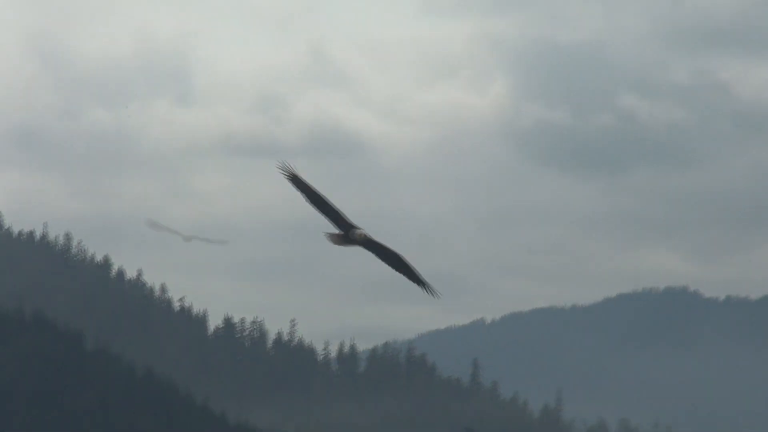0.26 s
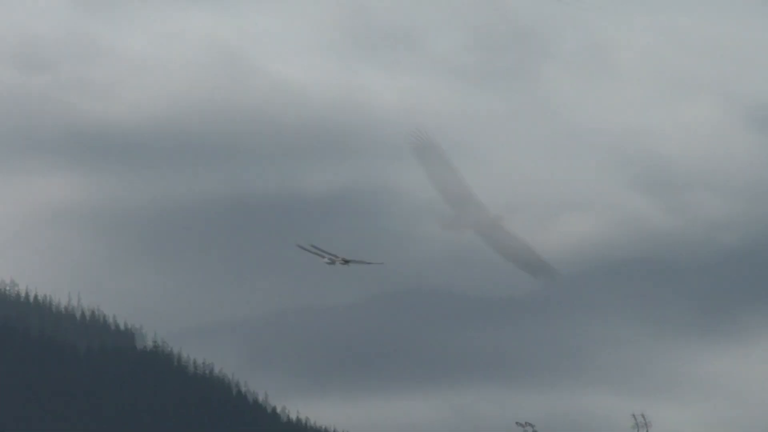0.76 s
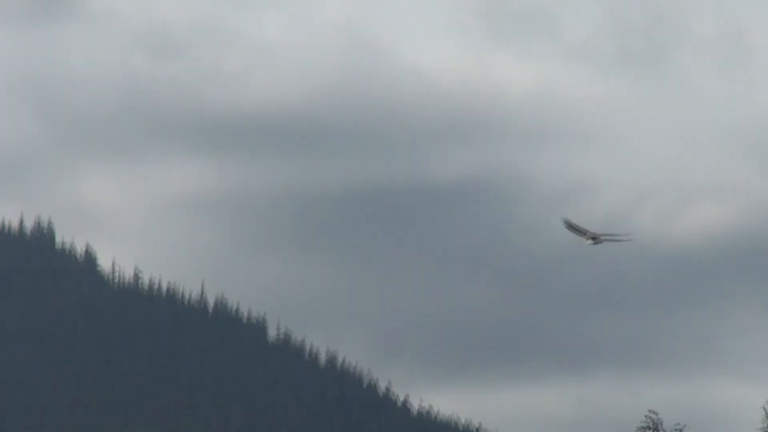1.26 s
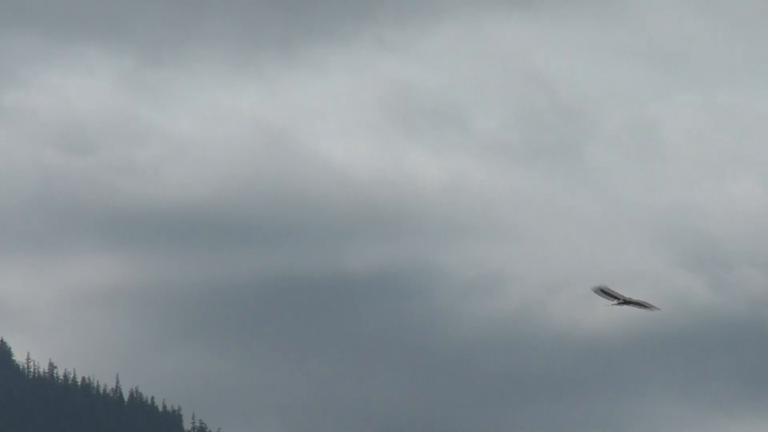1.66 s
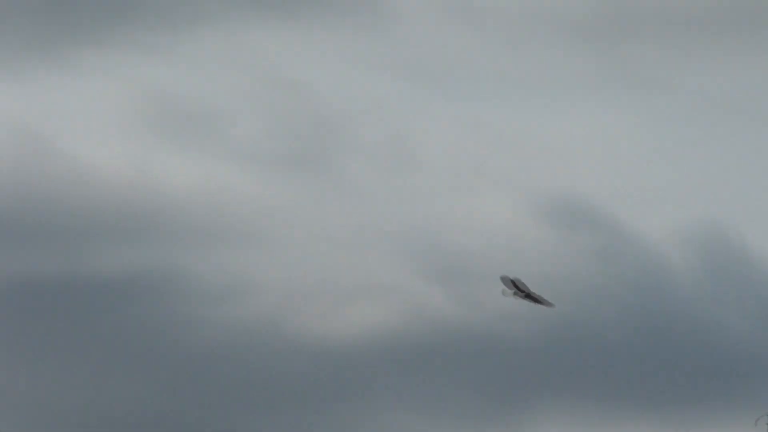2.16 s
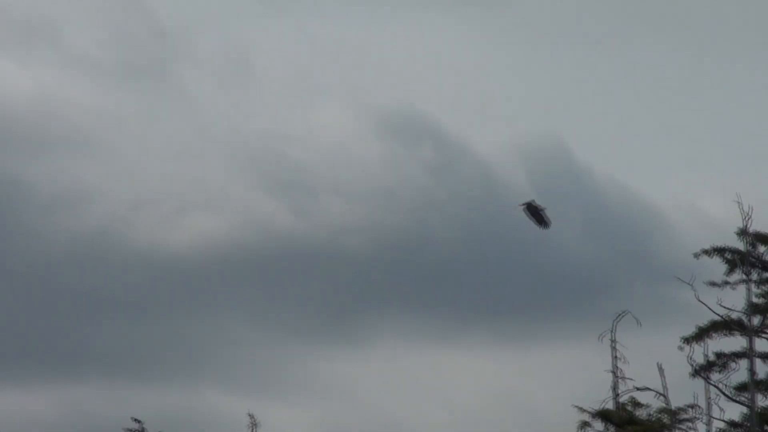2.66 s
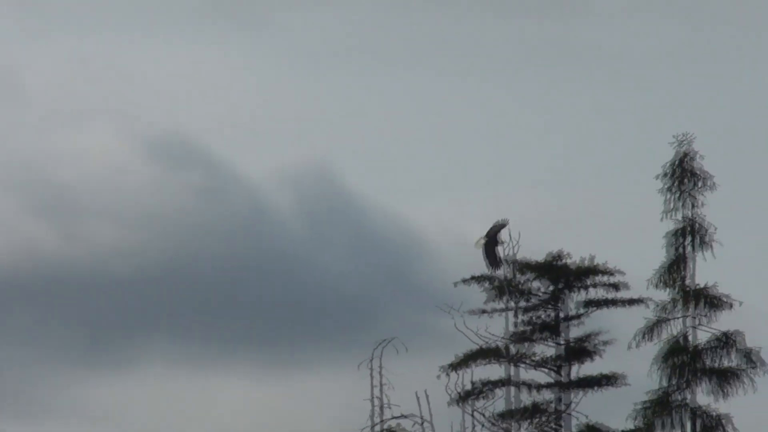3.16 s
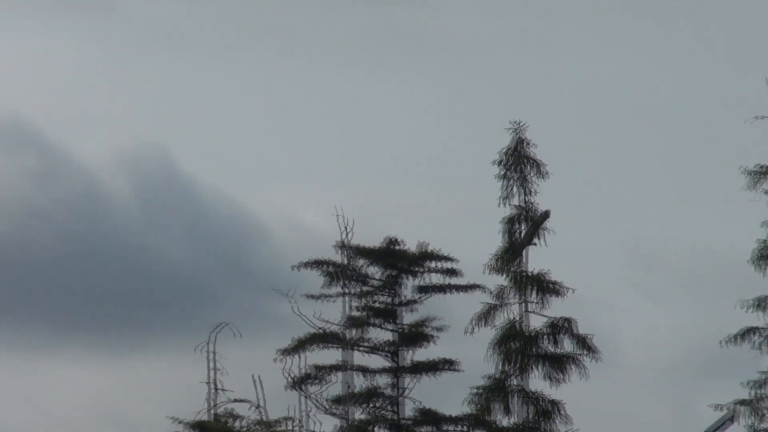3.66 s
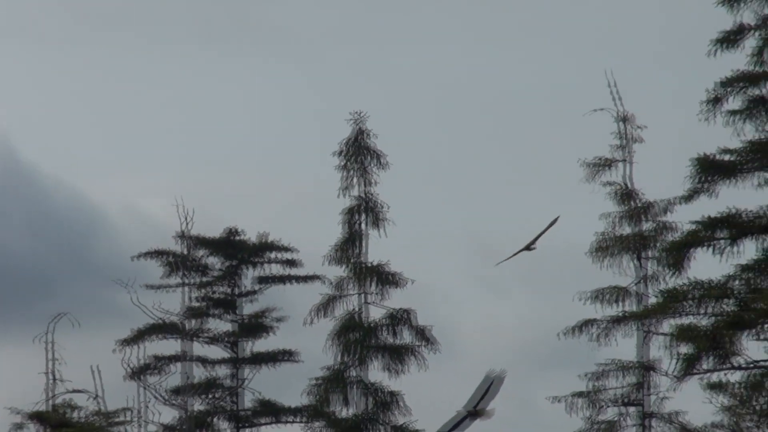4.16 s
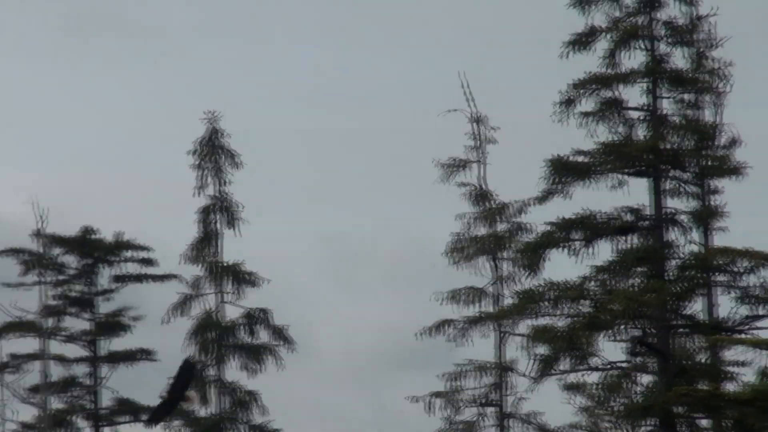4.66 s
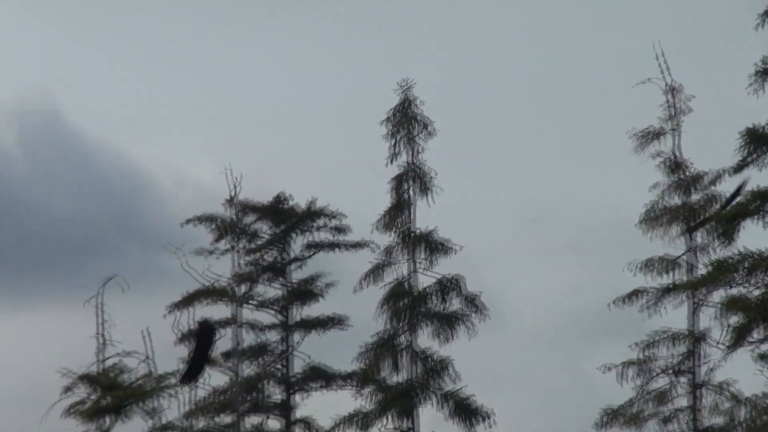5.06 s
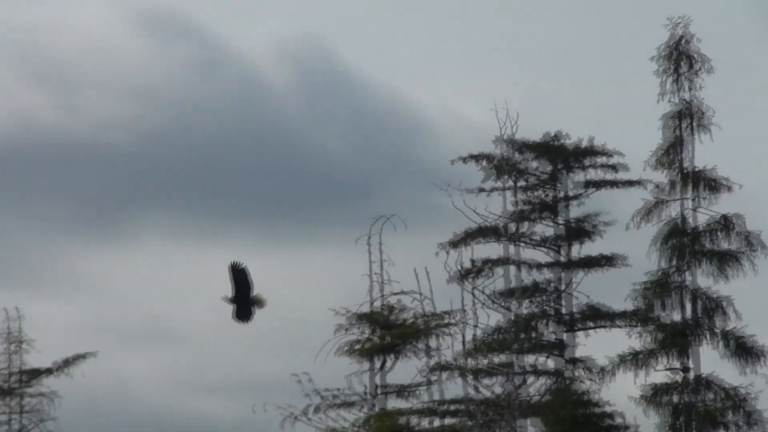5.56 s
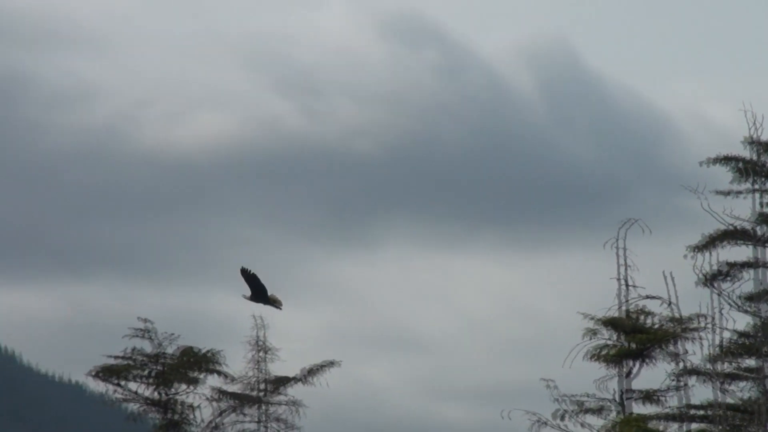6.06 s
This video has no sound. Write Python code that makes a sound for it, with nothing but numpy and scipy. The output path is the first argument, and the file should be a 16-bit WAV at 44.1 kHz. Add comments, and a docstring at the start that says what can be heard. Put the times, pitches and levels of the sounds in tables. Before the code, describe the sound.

Eagles chatter outdoors in a conifer forest, their piercing chirps and sliding whistles coming in quick, stuttering runs with a short echo. Before them, a small bird warbles over a brief soft rush and one far eagle gives a wavering call. The chatter then comes closer, grows louder and weakens at the end. Underneath are a quiet steady hiss, a very faint electric hum and a few tiny snaps close to the microphone.

```python
"""A rushing noise and a small bird's warble come first; the rush fades into the hiss of a forest valley.
A far eagle's call arrives blurred by echoes, then nearer eagles chatter: held notes, glides and fast
plunges of pitch, each a fluttering tone of the syrinx that rings on among the conifer trunks.
A faint electric hum sits mostly on the right, and now and then something snaps near the microphone."""
import sys
import numpy as np
from scipy import signal
from scipy.fft import rfft, irfft, next_fast_len
from scipy.io import wavfile
from scipy.ndimage import map_coordinates

SR = 44100
rng = np.random.default_rng(int(sys.argv[2]) if len(sys.argv) > 2 else 0)


def generate_wav(sig):
    """Save sig (samples, or channels by samples) to the path in sys.argv[1] as 16-bit PCM at SR."""
    pcm = np.round(np.clip(np.atleast_2d(sig).T, -1, 1) * 32767).astype(np.int16)
    wavfile.write(sys.argv[1], SR, pcm)


N = 278712
THIN_OCTAVE_DB = -36  # second harmonic of the eagles' whistles, glides and plunges


def amp(db):
    """Decibel law: amplitude grows tenfold every 20 dB."""
    return 10 ** (np.asarray(db) / 20)


def unit(x):
    """Normalisation to an rms of 1."""
    return x / np.sqrt(np.mean(x ** 2) + 1e-20)


def along(points, hz):
    """Interpolation of (Hz, value) points on a logarithmic frequency axis."""
    freqs, values = np.transpose(points)
    return np.interp(np.log(hz + 1), np.log(freqs + 1), values)


def curves(rows):
    """Linear interpolation in time: one curve for each column after the first."""
    times, *columns = np.transpose(rows)
    return [np.interp(np.arange(N) / SR, times, column) for column in columns]


def wobble(rate):
    """Random modulation: a spline through `rate` Gaussian knots a second."""
    return map_coordinates(rng.standard_normal(int(N * rate / SR) + 4), [np.arange(N) * rate / SR])


def filtered(x, response):
    """Linear filtering: the spectrum is multiplied by a frequency response."""
    size = next_fast_len(N + SR // 2)
    return irfft(rfft(x, size) * response(np.fft.rfftfreq(size, 1 / SR)), size)[..., :N]


def hiss(colour, coherence, lean=((1, 0),)):
    """Partial coherence: the sum and difference of two noises make a stereo pair of rms 1."""
    mid, side = rng.standard_normal((2, N))
    angle = np.arccos(coherence) / 2
    pair = np.cos(angle) * mid + np.sin(angle) * np.array([side, -side])
    return unit(filtered(pair, lambda hz: amp(along(colour, hz) + np.outer([.5, -.5], along(lean, hz)))))


def background():
    """Shaped broadband noise: a rush dies away in about a second while the valley's hiss stays."""
    # Envelopes. Each row: time in seconds, level in dB.
    rush_levels = [(0, -50), (.42, -51.5), (.7, -58), (1.2, -93)]
    valley_levels = [(0, -52), (3.5, -54), (4.6, -52), (6.32, -50.5)]
    # Spectra. Each row: frequency in Hz, relative density in dB.
    rush_colour = [(100, -26), (240, -5.5), (990, 3.5), (2500, -18), (5000, -57)]
    valley_colour = [(40, -34), (90, -31.5), (130, -8), (230, -14.5), (430, -4), (1400, -5), (2700, -10.5),
                     (7000, -19.5), (14300, -33), (15700, -48)]
    # Balance of the hiss. Each row: frequency in Hz, left minus right in dB.
    valley_lean = [(100, -18.5), (400, -4), (1300, 1), (5000, 4.5), (15000, -5.5)]
    rush_gain = amp(curves(rush_levels)[0] + 0.51 * wobble(9))
    rush = rush_gain * hiss(rush_colour, coherence=0.64, lean=[(200, -19.5), (2000, -1.0)])
    valley_gain = amp(curves(valley_levels)[0] + .45 * wobble(3))
    return rush + valley_gain * hiss(valley_colour, coherence=0.42, lean=valley_lean)


def hum():
    """A harmonic series: electric hum, each partial slightly unsteady in level, louder on the right."""
    # Each row: frequency in Hz, relative level in dB.
    partials = [(59.2, -66), (118.4, -67), (177.6, -75), (296.1, -92.5)]
    t = np.arange(N) / SR
    tone = sum(amp(db - 4.5 + .4 * wobble(4.9)) * np.sin(2 * np.pi * (hz * t + rng.random()))
               for hz, db in partials)
    return tone * amp([[-12], [5]])


def snaps():
    """Transients: brief, rough envelopes on noise are heard as snaps close by."""
    # Each row: start in seconds, relative level in dB, length in seconds.
    bursts = [(0.402, -54, 0.015), (0.538, -57, 0.019), (1.766, -60, 0.015), (1.82, -63, .009),
              (2.966, -48, 0.014)]
    # Their spectrum. Each row: frequency in Hz, relative density in dB.
    colour = [(400, -49), (650, 2), (850, -7), (1080, -3), (1700, -17), (3600, -12), (15000, -37.5)]
    gate = np.zeros(N)
    for start, db, length in bursts:
        progress = np.arange(round(length * SR) + 9) / (length * SR + 9)
        gate[round(start * SR):][:len(progress)] += amp(db + 12) * np.sin(np.pi * progress ** 0.7) ** 2
    return gate * amp(2.2 * wobble(500)) * hiss(colour, coherence=0.6)


def forest(calls, steps=20):
    """Reverberation by scattering: echo patterns cross-fade, as they do when birds move among trunks."""
    # Decay of the far slopes' echoes. Each row: frequency in Hz, time to fall 60 dB in seconds.
    far_t60 = [(2000, 1), (9000, 0.76)]
    # Trunks return low notes more weakly. Each row: frequency in Hz, gain in dB.
    echo_colour = [(2000, -7), (3000, -2), (4000, 0), (7000, 0)]
    near_t60 = 0.14  # seconds, for the near trunks
    echoes, hop = np.zeros((2, N)), N / steps
    calls = calls * amp(5.83 * wobble(160))  # swaying boughs blur the pitch they throw back
    for k in range(steps + 1):
        span = np.arange(max(round((k - 1) * hop), 0), min(round((k + 1) * hop), N))
        shared, *sides = rng.standard_normal((3, SR))
        hz, t, spectra = signal.stft(1.03 * shared + .5 * np.array(sides), SR, nperseg=256)
        decay = amp(-60 * t / along(far_t60, hz)[:, None]) + 2.3 * amp(-60 * t / near_t60)
        tail = signal.istft(spectra * decay, SR, nperseg=256)[1]
        piece = calls[span] * np.cos(np.pi / 2 * (span / hop - k))
        wet = signal.fftconvolve(piece[None], tail / np.linalg.norm(tail[0]), axes=1)
        echoes[:, span[0]:span[0] + wet.shape[1]] += wet[:, :N - span[0]]
    return filtered(echoes, lambda hz: amp(along(echo_colour, hz)))


def far_eagle():
    """Multipath smearing: echoes melt distant notes into two wavering, pulsing bands of noise."""
    # The two voices. Each row: time in seconds, pitch in Hz, level in dB.
    lower = [(0.85, 3893, -58), (1.0, 4090, -56.5), (1.25, 4115, -58), (1.42, 4150, -53.5),
             (1.95, 4160, -82)]
    upper = [(.9, 4770, -63), (.96, 4990, -55.5), (1.05, 5080, -57.5), (1.25, 5185, -56), (1.55, 5190, -73)]
    call, t = np.zeros(N), np.arange(N) / SR
    for voice in lower, upper:
        hz, db = curves(voice)
        gate = np.clip(np.minimum(t - voice[0][0], voice[-1][0] - t) * 50, 0, 1)
        phase = 2 * np.pi * np.cumsum(hz + 40 * wobble(18)) / SR
        band = wobble(300) * np.sin(phase) + wobble(300) * np.cos(phase)
        call += gate * amp(db + 2 * wobble(20)) * unit(band)
    return call


def syrinx(notes, hoarse, fade_db=0):
    """Phase modulation: flutter roughens a harmonic tone on an arc of pitch, most in fast glides."""
    # Air rushing through the open beak. Each row: frequency in Hz, relative density in dB.
    breath_colour = [(1500, -6.5), (3500, 7.5), (7000, -6), (12000, -30.5)]
    attack, release = 0.24, 0.28  # shares of a note's length
    song = np.zeros(N + SR)
    flutter = np.pad(wobble(350) + 0.2 * wobble(1500), (0, SR))
    breath = amp(-30.5) * np.pad(hiss(breath_colour, coherence=0.97)[0], (0, SR))
    for start, length, start_hz, middle_hz, end_hz, db, octave_db in notes:
        u = np.arange(round(length * SR)) / (length * SR)  # progress from 0 to 1
        span = slice(round(start * SR), round(start * SR) + len(u))
        hz = start_hz * (1 - u) * (1 - 2 * u) + middle_hz * 4 * u * (1 - u) + end_hz * u * (2 * u - 1)
        strain = hoarse + .022 * abs(np.log(end_hz / start_hz)) / length
        phase = 2 * np.pi * np.cumsum(hz) / SR + strain * flutter[span]
        overtones = np.sin(2 * phase) + amp(-27) * np.sin(3 * phase)
        overtones += amp(octave_db - 29) * np.sin(4 * phase)
        voice = np.sin(phase) + amp(octave_db) * overtones + breath[span]
        swell = np.sin(np.pi / 2 * np.clip(np.minimum(u / attack, (1 - u) / release), 0, 1)) ** 2
        song[span] += amp(db + fade_db * (u - .5)) * swell * voice
    return song[:N] * amp(1.95 * wobble(130))


def small_bird():
    """Frequency modulation: one warbled syllable repeats, never quite alike, among single notes."""
    # Each row: start in seconds, level in dB.
    repeats = [(.056, -42), (.16, -40), (0.318, -40.5), (0.424, -41)]
    # A swoop up, a low arch, two dips and a high arch. Each row: delay and length in seconds,
    # start, middle and end pitch in Hz, relative level in dB.
    syllable = [(0, 0.021, 4420, 5950, 6400, -0.5), (.003, 0.022, 4300, 4830, 3770, -3.5),
                (0.017, 0.026, 6300, 5490, 6500, 2.2), (0.042, .022, 6000, 5440, 5900, -7),
                (0.045, 0.02, 6500, 6400, 5800, -3.5)]
    # Each row: start and length in seconds, start, middle and end pitch in Hz, level in dB.
    peeps = [(.001, 0.016, 6020, 6600, 5800, -37), (0.027, .026, 6600, 6500, 5200, -51),
             (.127, 0.028, 3150, 3750, 3600, -49.5), (0.186, 0.033, 4930, 5070, 4820, -44),
             (.566, 0.028, 3440, 4320, 4990, -53.5), (0.1, 0.018, 3500, 3830, 3700, -54),
             (.197, 0.024, 3280, 3830, 3600, -53), (.408, 0.022, 2274, 2595, 2750, -54),
             (0.725, 0.013, 4200, 5600, 6400, -51.5), (0.733, .03, 6440, 4800, 3800, -50),
             (0.805, 0.034, 4500, 5270, 4860, -53.5), (0.838, .03, 7200, 6500, 6170, -56),
             (.86, 0.033, 7400, 7800, 8140, -63)]
    pitch_scatter, scatter_db, octave_db = 0.014, 1, -28
    warble = [(start + delay, length, *np.multiply(hz, 1 + pitch_scatter * rng.standard_normal(3)),
               db + part_db + scatter_db * rng.standard_normal())
              for start, db in repeats for delay, length, *hz, part_db in syllable]
    return syrinx([(*note, octave_db) for note in warble + peeps], hoarse=0.52)


def eagle_whistles():
    """Nearly pure tones: thin notes settle on a pitch, or glide and slow as they arrive."""
    # Each row: start and length in seconds, pitch in Hz, level in dB.
    whistles = [(1.488, 0.034, 6300, -52), (2.33, 0.024, 5050, -54), (2.373, .068, 5000, -52),
                (2.434, .037, 5060, -49), (2.482, 0.058, 4910, -43), (2.5, 0.033, 5110, -48),
                (2.599, 0.021, 5040, -42.5), (2.602, 0.022, 3840, -37.5), (3.661, .041, 6720, -46),
                (3.673, 0.064, 5830, -47.5), (3.699, 0.036, 4940, -39), (3.786, 0.026, 5870, -46),
                (3.793, 0.049, 5090, -30.5), (3.902, 0.032, 5130, -35), (4.013, .031, 4990, -26),
                (4.129, 0.018, 4960, -34), (4.327, 0.016, 6540, -29.5), (4.562, .015, 5300, -35.5),
                (5.212, 0.024, 7090, -33.5), (5.229, 0.026, 7130, -33.5), (5.257, 0.031, 6030, -34),
                (5.282, 0.013, 5100, -24.5), (5.356, 0.022, 5970, -39), (5.366, .041, 5210, -26),
                (5.476, 0.03, 5220, -28.5), (5.499, 0.037, 5200, -41)]
    # Each row: start and length in seconds, start and end pitch in Hz, level in dB.
    glides = [(0.932, 0.022, 2710, 4680, -48), (0.94, 0.026, 3410, 3720, -47.5),
              (2.186, 0.038, 5100, 6300, -55), (2.217, .01, 4480, 6200, -31.5),
              (2.223, 0.054, 3260, 3760, -48), (2.242, 0.0089, 7400, 5300, -39),
              (2.412, .02, 4360, 4020, -43.5), (2.514, 0.023, 4400, 3900, -36.5),
              (3.221, 0.022, 3200, 3590, -52), (3.626, 0.045, 5520, 6700, -44.5),
              (3.712, .033, 4380, 3890, -38.5), (3.825, 0.02, 4600, 4060, -37.5),
              (3.93, 0.015, 4530, 4110, -31), (3.937, 0.014, 3660, 3260, -47.5),
              (4.039, 0.012, 4170, 4120, -26), (4.164, .012, 3320, 3100, -52),
              (4.321, .01, 4370, 6520, -31.5), (4.35, .01, 3980, 2790, -29.5),
              (4.411, 0.011, 4170, 5730, -43.5), (4.46, .012, 3485, 2800, -27),
              (5.003, 0.021, 2970, 4720, -47.5), (5.172, 0.01, 4450, 6390, -35.5),
              (5.176, 0.048, 6000, 7680, -36.5), (5.292, 0.018, 4440, 3970, -25),
              (5.394, 0.024, 4730, 4150, -29), (5.502, 0.016, 4630, 4216, -22),
              (5.51, 0.018, 4620, 4310, -42), (5.77, .041, 2700, 3470, -50),
              (6.11, 0.039, 2790, 3530, -49.5)]
    onset_ratio, done_halfway = 1.011, 0.8
    held = [(start, length, hz * onset_ratio, hz, hz, db) for start, length, hz, db in whistles]
    gliding = [(start, length, from_hz, from_hz + done_halfway * (to_hz - from_hz), to_hz, db)
               for start, length, from_hz, to_hz, db in glides]
    return syrinx([(*note, THIN_OCTAVE_DB) for note in held + gliding], hoarse=0.41)


def eagle_plunges():
    """Downward sweeps: each rough drop speeds up towards one low pitch, losing voice on the way."""
    # Each row: start and length in seconds, start pitch in Hz, level at mid-note in dB.
    drops = [(1.489, .011, 6420, -49), (2.218, .027, 6570, -38.5), (2.337, .016, 5560, -39),
             (2.448, .01, 4720, -45), (3.674, .013, 6600, -44), (3.778, .018, 7300, -49.5),
             (3.892, .014, 7300, -48), (4.006, .015, 7010, -46), (4.125, .01, 7000, -46.5),
             (4.337, .019, 6060, -38.5), (4.443, .019, 6700, -33), (4.563, .021, 5860, -46),
             (4.694, .013, 5330, -42), (4.832, .0086, 4700, -45), (4.993, .0093, 3800, -47),
             (5.249, .011, 7140, -34), (5.352, .01, 7330, -37.5), (5.467, .011, 7330, -38),
             (5.585, .01, 6910, -40.5), (5.693, .012, 6660, -49), (5.798, .014, 5730, -42)]
    end_hz, done_halfway = 2576, .4
    notes = [(start, length, hz, hz + done_halfway * (end_hz - hz), end_hz, db, THIN_OCTAVE_DB)
             for start, length, hz, db in drops]
    return syrinx(notes, hoarse=1, fade_db=-14)


def eagle_chirps():
    """Harmonic tones: the octave fills out held notes that bend a little at both ends."""
    # Each row: start and length in seconds, pitch in Hz, level in dB, relative octave level in dB.
    chirps = [(0.76, 0.025, 2232, -42, -14), (1.097, 0.024, 2220, -39.5, -11),
              (1.134, .024, 2780, -48.5, -18), (1.156, .028, 2794, -39, -12),
              (1.223, 0.028, 4100, -48, -20), (1.331, .039, 3970, -48, -9.5),
              (1.419, 0.025, 2136, -40.5, -20), (1.443, 0.011, 2855, -44, -23),
              (1.51, 0.015, 2910, -35.5, -15), (2.136, 0.033, 2878, -33, -3),
              (2.14, 0.044, 3855, -43.5, -14), (2.181, 0.014, 2930, -45, -15),
              (2.238, 0.035, 2910, -33.5, -7), (2.285, 0.021, 3990, -50, -23), (2.345, 0.03, 2926, -33, -7),
              (2.462, 0.022, 2780, -31, -7), (2.589, 0.034, 2728, -35, -8.5),
              (2.59, 0.0085, 2475, -38.5, -6), (2.729, 0.011, 3780, -44, -9.5),
              (2.732, 0.017, 2198, -28, -9), (2.895, 0.019, 2066, -32, -7),
              (4.132, 0.033, 4138, -22.5, -30.5), (4.226, .028, 2855, -30, -1.5),
              (4.251, 0.029, 4000, -27, -15.5), (4.252, 0.031, 2940, -27.5, -5.5),
              (4.362, .016, 3005, -26, -8), (4.471, 0.015, 2933, -29, -7.5),
              (4.577, 0.026, 2840, -27.5, -8), (4.704, 0.042, 2798, -31.5, -7),
              (4.837, 0.027, 2720, -29, -15), (4.986, 0.027, 2671, -26.5, -15.5),
              (5.151, 0.023, 2009, -32.5, 5), (5.358, 0.012, 1650, -39, -7),
              (5.587, 0.046, 4304, -21.5, -26), (5.699, .033, 4087, -23.5, -22),
              (5.73, 0.0074, 3250, -37.5, -26), (5.81, 0.019, 3980, -25, -15.5),
              (5.818, 0.027, 2744, -30.5, -22), (5.836, 0.012, 3220, -39, -15),
              (6.146, 0.017, 2220, -37.5, -16), (6.162, 0.022, 2770, -40.5, -15),
              (6.222, 0.033, 2760, -45, -14), (6.273, 0.028, 2705, -50, -22)]
    # Low notes lift into place, high ones sag. Each row: pitch in Hz, start and end as shares above it.
    bends = [(2120, -0.0077, -0.002), (2820, 0.021, -0.0099), (4040, 0.0102, -0.04)]
    pitches, start_bend, end_bend = np.transpose(bends)
    notes = [(start, length, hz * (1 + np.interp(hz, pitches, start_bend)), hz,
              hz * (1 + np.interp(hz, pitches, end_bend)), db, octave_db)
             for start, length, hz, db, octave_db in chirps]
    return syrinx(notes, hoarse=0.3)


def microphone_ports(hz):
    """Level and phase differences: the right port hears the birds louder, and their treble first."""
    # Each row: frequency in Hz, phase lead of the right port in radians.
    lead = [(5000, 0.3), (8000, 1.5)]
    return amp([[-2.1], [1.8]]) * np.exp(1j * np.outer([-.5, .5], along(lead, hz)))


def scene():
    """Superposition: direct calls, early reflections and reverberation add to snaps, hum and hiss."""
    eagles = eagle_chirps() + eagle_whistles() + eagle_plunges()
    eagles = eagles + amp(-14.5) * np.roll(eagles, round(.0115 * SR))  # reflection off the ground
    small, far = small_bird(), far_eagle()
    small = small + amp(-9) * np.roll(small, round(.016 * SR))  # reflection off a near trunk
    echoes = amp(-8) * forest(eagles + 0.98 * small + 1.83 * far)
    birds = eagles + small + 0.82 * far + echoes
    return filtered(birds, microphone_ports) + snaps() + hum() + background()


def record(dry, top_hz=15710):
    """Band limiting: an ideal low-pass filter removes the highest treble."""
    return filtered(dry, lambda hz: hz < top_hz)


dry = scene()
out = record(dry)
generate_wav(out)
```